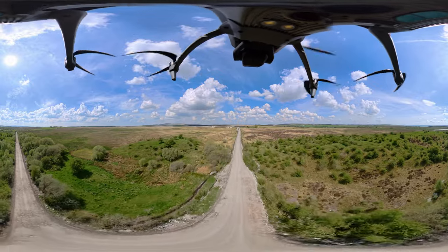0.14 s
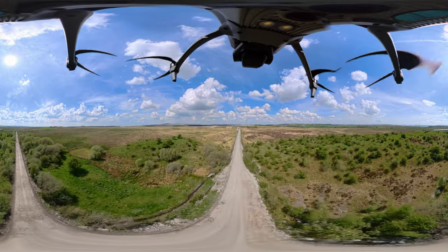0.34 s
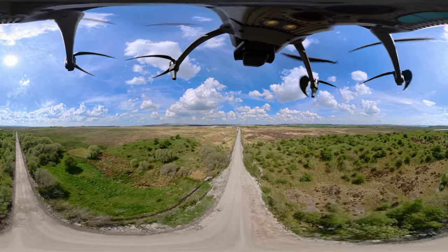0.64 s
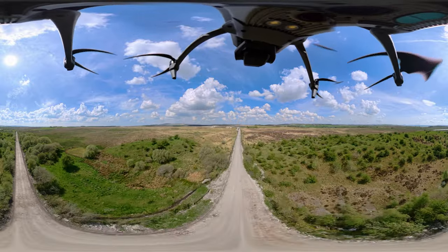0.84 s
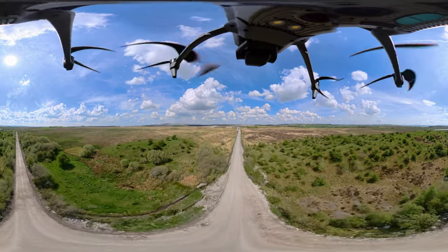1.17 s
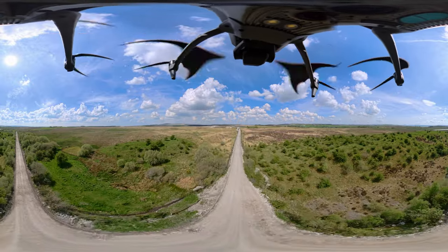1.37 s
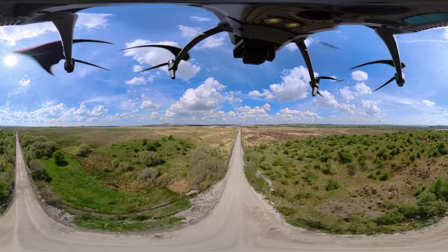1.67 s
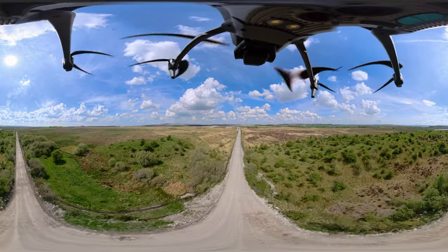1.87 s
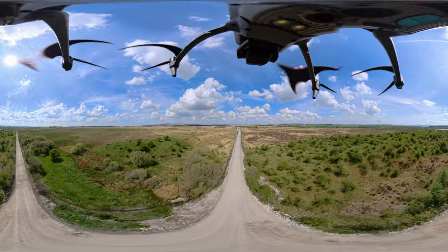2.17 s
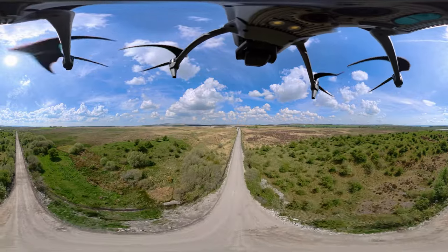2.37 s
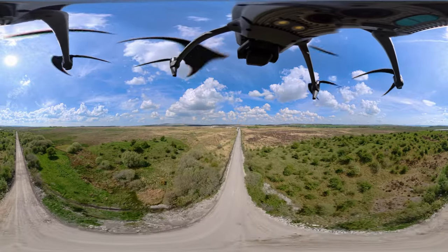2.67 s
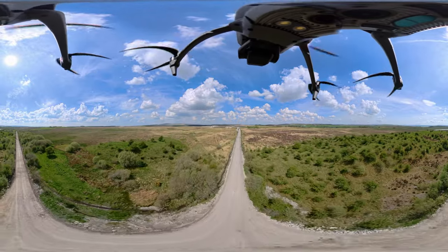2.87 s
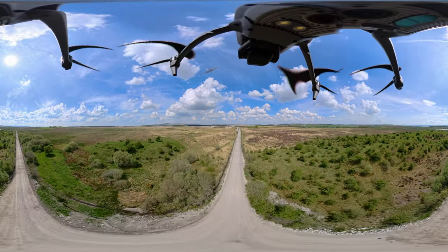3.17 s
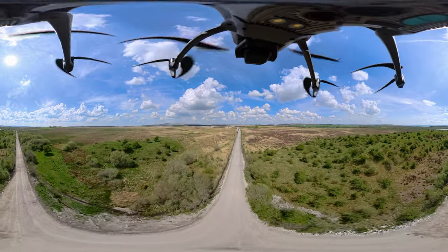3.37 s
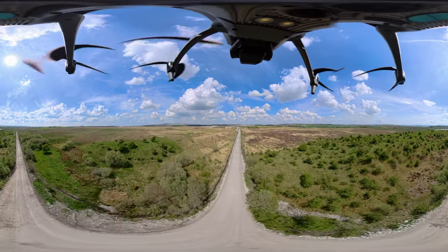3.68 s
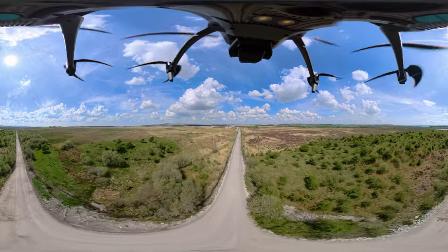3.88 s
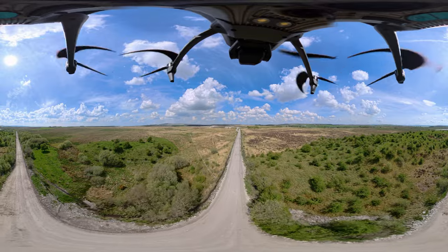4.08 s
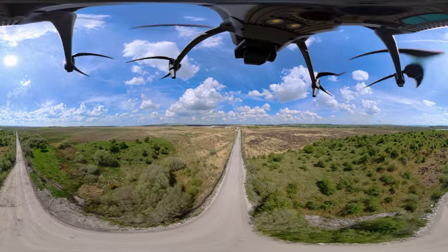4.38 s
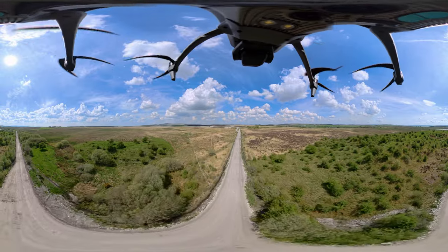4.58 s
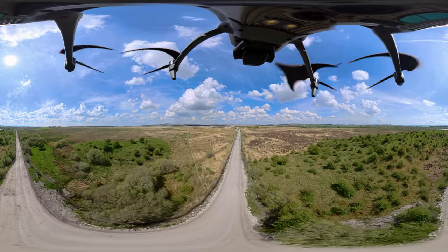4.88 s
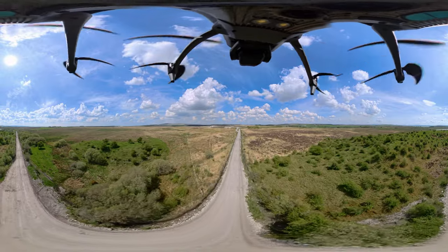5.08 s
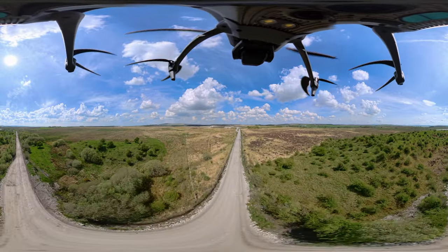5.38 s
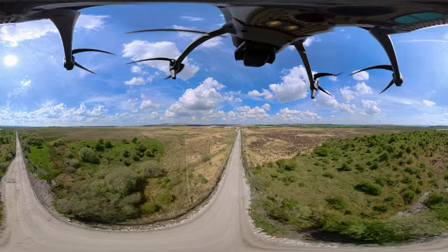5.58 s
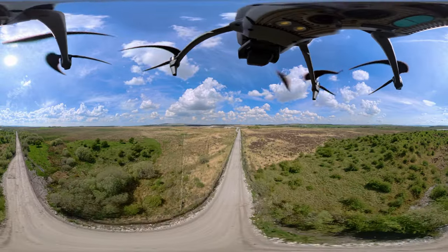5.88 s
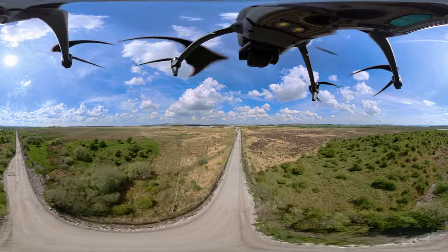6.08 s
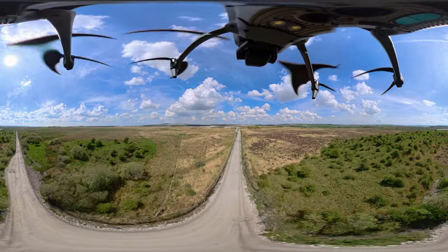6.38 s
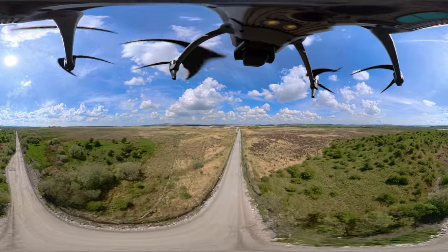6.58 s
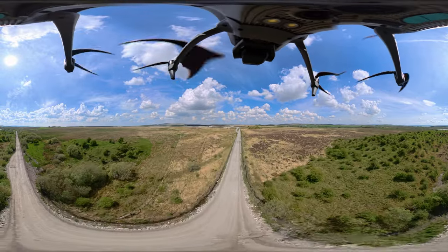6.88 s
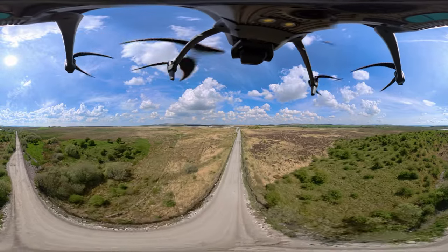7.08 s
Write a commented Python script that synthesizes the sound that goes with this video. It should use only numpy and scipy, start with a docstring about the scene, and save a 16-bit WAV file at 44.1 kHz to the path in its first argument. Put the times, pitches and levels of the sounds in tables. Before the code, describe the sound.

Open moorland on a breezy day, heard through an exposed microphone. A mild gust rumbles at first under faint, brief chirps and a tiny creak at 0.3 s. From about 0.9 s a small bird sings clear, slurred high whistles, strongest between 1.2 and 3 s, with thin, very high twitters around 1.3-2.6 s. Lower chirps from another bird answer, notably at 3-3.5 s and 4.4 s. Deep gusts swell from 1.1 to 4 s, with soft thumps near 1.4, 3 and 3.9 s. The mount creaks and clicks, sharpest at 4.0 s, with a ringing tick at 4.3 s. A fine close rustle runs from 4.2 to 5.1 s, with a rough, narrow swish near 4.9 s. The wind then eases, chirps thin out, and distant raspy gulls call from 5.8 s, clearer around 6.7-7.2 s, over breeze, hiss and a faint steady tone.

```python
"""Birds on open moorland

A breezy day: two small birds trade slurred whistles built from a few syllables, with thin wavering sounds among
them: high twitter phrases, then one rough, narrow swish in the song's range. More birds and gulls call far off.
Whistles, twitter and that swish are gliding tones; gulls are harmonics chopped into a rasp. Filtered noise makes
the gusts rumbling on the microphone, the breeze and a close rustle; close by, the mount creaks in runs of slips
and ticks with ringing tones. Hiss and a faint tone lie beneath."""
import sys
import numpy as np
from scipy import signal
from scipy.fft import rfft, irfft, next_fast_len
from scipy.io import wavfile
from scipy.ndimage import uniform_filter1d, map_coordinates

SR = 44100
rng = np.random.default_rng(int(sys.argv[2]) if len(sys.argv) > 2 else 0)


def wav_out(sig):
    """Save sig, one row per channel (or a flat mono array), as 16-bit PCM at SR to the path in sys.argv[1]."""
    wavfile.write(sys.argv[1], SR, np.round(np.clip(np.atleast_2d(sig).T, -1, 1) * 32767).astype(np.int16))


N = 319284

# syllables of the song, by name: length_share [0-1], pitch_share [0-1, low to high], relative_level_db [dB]
SYLLABLES = { "peak": [(0.0, 0.19, -24.5), (0.32, 0.18, -2), (0.5, 0.6, -12), (0.66, 0.72, -32),
             (0.83, 0.93, -16), (1.0, 0.0, -3.5)], "spike": [(0.0, 0.36, -15), (0.3, 0.46, -2),
             (0.49, 0.91, -12), (0.66, 0.26, -2), (1.0, 0.042, -10.5)], "arch": [(0.0, 0.33, -11),
             (0.3, 0.76, -2), (0.61, 0.97, 2), (0.84, 0.53, -1.5), (1.0, 0.0, -9.5)],
             "hook": [(0, 0.63, -4), (.33, 0.07, -10), (.66, .3, -2.5), (.83, .6, 2.5), (1, 0.94, -14)],
             "swoop": [(0, .45, 3), (.27, .03, -7), (.5, 0.017, -5), (.72, 0.12, -2.5), (.91, .47, 7.5),
             (1, 0.98, 7.5)], "scoop": [(0, .1, -6), (.33, 0.065, -7), (.72, .38, -1.5), (1, 1, -3.5)],
             "droop": [(0.0, 0.96, -14), (0.39, 0.76, -5), (0.78, 0.74, -10), (1.0, 0.047, -3)],
             "slide": [(0, 1, -4), (.3, .69, 1), (.64, .6, 0), (.88, .39, -2), (1, 0, -11)],
             "stair": [(0.0, 0.0062, -13), (0.15, 0.125, 0.5), (0.44, 0.3, 1), (0.63, 0.78, -4),
             (1.0, 0.94, 0)], "curl": [(0, 0, -6), (.09, .02, -3), (.2, .3, 0), (.45, .16, 0),
             (.69, .49, 1), (.87, .68, -3), (1, 1, -6)], "fall": [(0.0, 0.94, -2), (0.33, 0.63, -1),
             (0.74, 0.3, -0.5), (1.0, 0.032, -2)], "rise": [(0.0, 0.043, -6), (0.43, 0.52, -2.5),
             (1.0, 0.96, -4)]}
# notes sung to each syllable: start_s [s], length_s [s], low_hz [Hz], high_hz [Hz],
# base_level_db [dB, the syllable's level is added]
SONG_NOTES = { "peak": [(0.935, 0.072, 4800, 5930, -70.5), (1.091, 0.081, 4510, 6680, -63),
              (1.268, 0.074, 4526, 7090, -51), (1.44, 0.088, 4360, 7040, -61)],
              "spike": [(2.588, 0.086, 4600, 7070, -60.5), (2.73, 0.12, 4410, 7570, -70.5),
              (2.891, 0.097, 4425, 7970, -60.5), (3.745, .07, 2973, 3820, -71),
              (3.914, 0.1, 2780, 3610, -75)], "hook": [(2.005, .088, 3670, 6680, -64.5),
              (6.228, .085, 2490, 3530, -86.5)], "swoop": [(3.548, .1, 3210, 5280, -66)],
              "scoop": [(1.828, 0.077, 3580, 6330, -66), (4.72, 0.13, 2720, 3260, -73),
              (5.598, 0.059, 3160, 3960, -80), (5.803, 0.062, 3360, 4160, -80.5),
              (6.005, 0.13, 2620, 3650, -86)], "droop": [(2.201, 0.058, 5394, 7400, -66.5),
              (2.344, 0.054, 6400, 7020, -65.5), (2.47, 0.065, 4800, 7365, -67.5)],
              "slide": [(1.615, .116, 3230, 6090, -68)], "arch": [(.665, 0.043, 3300, 3650, -87),
              (0.845, 0.035, 3195, 3740, -81), (1.808, 0.021, 3970, 4300, -73),
              (2.085, 0.028, 6630, 7100, -81), (2.176, 0.1, 2950, 4390, -69.5),
              (2.337, 0.089, 2770, 4187, -67.5), (3.049, 0.099, 3730, 4225, -61),
              (3.195, 0.048, 2360, 3360, -73.5), (3.223, 0.109, 3765, 4230, -68),
              (3.393, 0.098, 3580, 4244, -60), (3.665, .05, 2380, 2540, -85.5),
              (4.387, 0.027, 3100, 4380, -61)], "stair": [(2.492, .108, 2510, 4460, -71.5),
              (2.666, 0.152, 2638, 4370, -67.5)], "curl": [(5.182, .118, 2830, 4900, -84),
              (5.39, .123, 2800, 5100, -80.5)], "fall": [(.13, 0.038, 3120, 3550, -87),
              (.815, 0.02, 4280, 4830, -84), (1.185, 0.062, 3900, 4320, -83.5),
              (0.885, 0.038, 3080, 3133, -84), (2.903, 0.1363, 2660, 3700, -77),
              (3.121, 0.048, 2290, 3250, -77), (3.321, 0.071, 2275, 3270, -80),
              (3.805, .045, 2670, 3020, -81.5), (4.016, 0.054, 2646, 3400, -86),
              (4.319, 0.039, 2600, 3250, -71.5), (4.47, 0.06, 2780, 3630, -89),
              (4.525, 0.047, 2680, 2750, -79), (4.955, 0.04, 2290, 3230, -81.5),
              (5.677, 0.043, 2820, 3950, -91.5), (5.875, 0.067, 2770, 3860, -92),
              (6.445, 0.08, 2550, 3780, -83.5), (6.649, 0.058, 3310, 3920, -84),
              (7.012, 0.016, 2400, 4020, -82)], "rise": [(0.022, 0.0526, 5060, 5840, -84),
              (0.22, 0.029, 4410, 5020, -79), (.322, 0.039, 3950, 4910, -81),
              (0.53, 0.025, 3200, 4224, -87), (1.019, 0.034, 2877, 3790, -79),
              (1.145, 0.019, 2920, 4120, -78.5), (.45, .04, 2670, 3090, -86),
              (3.685, 0.064, 2750, 3500, -77), (3.8, 0.1, 2300, 3550, -83), (4.08, 0.05, 2680, 3050, -84),
              (4.12, 0.12, 2780, 3360, -73), (4.682, 0.032, 2343, 3510, -76.5),
              (6.852, 0.075, 2505, 3400, -79), (7.038, 0.072, 2454, 3330, -77.5),
              (7.21, 0.028, 2680, 3550, -79)]}
# thin wavering sounds, one arch each: high twitter phrases, then (last row) one rough, narrow swish in the
# song's range: start_s [s], length_s [s], low_hz [Hz], high_hz [Hz], base_level_db [dB, the arch's is added]
WAVERING_SOUNDS = [(1.336, 0.22, 8570, 8860, -92.5), (1.472, 0.15, 8500, 9350, -87),
                   (1.762, .17, 8700, 9140, -91), (2.437, .15, 8400, 9700, -85.5),
                   (2.578, .15, 8070, 8300, -94), (4.863, .27, 4280, 4890, -82)]
# gull calls, by voice: start_s [s], length_s [s], end_hz [Hz], beginning_hz [Hz],
# base_level_db [dB, the cry's level is added]
GULL_CALL_NOTES = {"full": [(5.82, .29, 1030, 1080, -85.5), (6.712, 0.152, 1170, 1210, -73),
                   (6.866, .28, 1045, 1100, -72)], "thin": [(5.84, .18, 1040, 1070, -85),
                   (6.27, .2, 984, 960, -83), (6.745, 0.095, 962, 975, -73.5), (7.11, .2, 961, 1002, -74)]}
# course of every gull cry: length_share [0-1], pitch_change_left [0-1], relative_level_db [dB]
GULL_CRY_SHAPE = [(0, 1, -6), (.3, .4, -1), (.72, .15, -1), (1, 0.0045, -3.5)]
# resonance of the two gull voices: frequency_hz [Hz], relative_level_db [dB]
FULL_GULL_THROAT = [(1050, -24), (2100, 0), (2450, 6), (3150, -27), (4200, -10.5), (5200, -9), (7000, -46)]
THIN_GULL_THROAT = [(1950, -5.5), (2900, -12), (3850, -4), (4850, -5.5), (7000, -19)]
# gusts on the microphone: start_s [s], attack_s [s], hold_s [s], relative_buffet_db [dB], release_s [s]
GUST_EVENTS = [(0.153, 0.15, 0.49, -57.5, 0.13), (1.104, 0.39, 0.033, -45.5, 0.022),
               (1.367, 0.016, 0.44, -46.5, 0.11), (2.014, 0.081, 0.039, -52, 0.18),
               (2.243, 0.1, 0.2, -47, 0.028), (2.898, 0.097, 0.03, -47.5, 0.076),
               (3.092, 0.08, 0.74, -48.5, 0.1), (3.832, 0.041, 0.077, -43.5, 0.18),
               (5.429, 0.079, 0.027, -54, 0.081), (5.65, 0.17, 1.24, -59.5, 0.15)]
# single eddies that thump the microphone: middle_s [s], swing_db [dB, before the fade around the middle]
THUMP_EVENTS = [(.715, -40), (1.446, -35), (2.997, -30.5), (3.934, -29.5), (5.519, -42)]
# spectrum of the buffeting: frequency_hz [Hz], relative_level_db [dB per Hz]
RUMBLE_SPECTRUM = [(12, -31), (22, 0.5), (38, 0.5), (55, -1), (229, -29.5), (600, -46), (2400, -60),
                   (9000, -73)]
# slow course of the breeze: time_s [s], relative_level_db [dB]
BREEZE_LEVEL = [(0, -79), (1.27, -74.5), (4.17, -75), (4.76, -76.5), (7.24, -72)]
# spectrum of the breeze: frequency_hz [Hz], relative_level_db [dB per Hz]
BREEZE_SPECTRUM = [(40, -20), (100, -6.5), (283, -14.5), (543, -17), (750, -22), (1080, -21.5),
                   (1400, -30.5), (4000, -44)]
# strokes of the rustle: time_s [s], relative_level_db [dB]
RUSTLE_STROKES = [(4.23, -93), (4.32, -82.5), (4.47, -76.5), (4.58, -78.5), (4.68, -93.5), (4.77, -77.5),
                  (4.85, -86.5), (4.93, -81), (5.04, -83.5), (5.14, -97)]
# spectrum of the rustle: frequency_hz [Hz], relative_level_db [dB per Hz]
RUSTLE_SPECTRUM = [(3400, -10), (4800, 1), (6600, -11), (7300, -24), (9900, -9.5), (10400, -6),
                   (11000, -11.5), (15500, -7)]
# ticks of the mount: start_s [s], knock_gain_db [dB], ping_gain_db [dB], ping_hz [Hz]
MOUNT_TICKS = [(2.581, -66.5, -67, 11700), (3.425, -66.5, -63, 11500), (3.464, -59, -79, 12100),
               (3.742, -81.5, -66, 13000), (4.0105, -46.5, -85, 8750), (4.021, -66, -66, 12000),
               (4.325, -65, -53.5, 4720)]
# ringing modes of the mount: pitch_hz [Hz], relative_level_db [dB], t60_s [s]
MOUNT_MODES = [(1663, 1, 0.013), (2050, -0.5, 0.0089), (1040, 0.5, 0.004), (5200, -5, 0.0081)]
# short creaks of the mount: middle_s [s], level_db [dB, before the body's response]
MOUNT_CREAKS = [(0.335, -89.5), (1.445, -85), (1.777, -81.5), (2.953, -88.5)]
# response of the creaking body: frequency_hz [Hz], gain_db [dB]
CREAK_BODY = [(200, 15), (600, 30.5), (1800, 22.0), (3000, 19.5), (6000, 12.5), (12000, -2)]
# spectrum of the background hiss: frequency_hz [Hz], relative_level_db [dB per Hz]
HISS_SPECTRUM = [(700, -22), (1300, -6.5), (3500, -3), (7200, -7.5), (14000, -12.5), (15500, -27.5)]

CALM_DB = -72.5  # buffet between gusts, on the same relative scale as the gusts
TURBULENCE_DB, TURBULENCE_PER_S = 1.5, 9.8  # scale of the stirring, random knots a second
HUM_HZ = 829.3
TOP_HZ = 15750  # band limit


def amp(db):
    """Decibels to gain."""
    return 10 ** (np.asarray(db) / 20)


def unit(x):
    """Scale to rms 1."""
    return x / np.sqrt(np.mean(x ** 2) + 1e-20)


def along(points, hz):
    """Read (Hz, value) points on a log frequency axis."""
    f, v = np.transpose(points)
    return np.interp(np.log(hz + 1), np.log(f + 1), v)


def curve(rows):
    """One value per sample from (s, value) rows."""
    return np.interp(np.arange(N) / SR, *np.transpose(rows))


def wobble(rate, size=N):
    """A smooth random curve, rate knots a second."""
    knots = rng.standard_normal(int(size * rate / SR) + 4)
    return map_coordinates(knots, [np.arange(size) * rate / SR])


def filtered(x, response):
    """Multiply the spectrum of x by a response of frequency."""
    m = next_fast_len(N + SR // 2)
    return irfft(rfft(x, m) * response(np.fft.rfftfreq(m, 1 / SR)), m)[:N]


def noise(spectrum):
    """Coloured noise of rms 1."""
    white = rng.standard_normal(N)
    return unit(filtered(white, lambda hz: amp(along(spectrum, hz))))


def add(track, s, sound):
    """Mix a sound into the track at s seconds."""
    room = track[max(round(s * SR), 0):][:len(sound)]
    room += sound[:len(room)]


def sung(shape, s, length, low_hz, high_hz, level_db):
    """Stretch a shape to one sound's length and pitch range: (s, Hz, dB) points."""
    when, height, db = np.transpose(shape)
    pitch = low_hz * (high_hz / low_hz) ** height
    return np.column_stack([s + length * when, pitch, level_db + db])


def glide(note, fade):
    """Start time, then pitch and gain per sample of a note slurred smoothly through its points."""
    u = np.linspace(0, len(note) - 1, 100)
    s, hz, db = (map_coordinates(col, [u], mode="mirror") for col in np.transpose(note))
    s = np.maximum.accumulate(s)  # time never runs backwards
    t = s[0] + np.arange(int((s[-1] - s[0]) * SR) + 2) / SR
    ends = np.clip(np.minimum(t - t[0], t[-1] - t) / fade, 0, 1)
    return t[0], np.interp(t, s, hz), ends * amp(np.interp(t, s, db))


def gliding_tones(notes, waver, waver_rate, flutter_db):
    """Sine tones slur and waver in pitch, nearly pure or roughened by the waver; their level flutters."""
    track = np.zeros(N)
    for note in notes:
        s, hz, gain = glide(note, fade=0.003)
        hz = hz * (1 + waver * wobble(waver_rate, size=len(hz)))
        gain = gain * amp(flutter_db * wobble(161.5, size=len(hz)))
        tone = np.sqrt(2) * np.sin(2 * np.pi * np.cumsum(hz) / SR)
        add(track, s, gain * tone)
    return track


def whistles():
    """A syrinx sings a nearly pure tone; moving air flutters its level on the way."""
    notes = [sung(SYLLABLES[name], *row) for name, rows in SONG_NOTES.items() for row in rows]
    return gliding_tones(notes, waver=0.007, waver_rate=250, flutter_db=2.5)


def wavering_sounds():
    """Fast, wide pitch waver thins and roughens arched tones: high twitter phrases, then one narrow swish."""
    arches = [sung(SYLLABLES["arch"], *row) for row in WAVERING_SOUNDS]
    return gliding_tones(arches, waver=0.024, waver_rate=500, flutter_db=5.5)


def gull(calls, throat, rasp_hz, sag, sharpness, jitter, shimmer_db):
    """A hoarse harmonic voice chopped into a fast, even rasp; the pitch sags within each beat."""
    voice = np.zeros(N)
    k = np.arange(1, 8)[:, None]  # harmonic numbers
    for call in calls:
        s, hz, gain = glide(call, fade=0.0044)
        beat_hz = rasp_hz * (1 + 0.022 * wobble(50, size=len(hz)))
        beat = 2 * np.pi * np.cumsum(beat_hz) / SR - np.pi  # starts closed
        hz = hz * (1 - sag * np.sin(beat) + jitter * wobble(900, size=len(hz)))
        shimmer = shimmer_db * np.array([wobble(207.3, size=len(hz)) for _ in k])
        partials = amp(along(throat, k * hz) + shimmer)
        phase = 2 * np.pi * k * np.cumsum(hz) / SR + rng.uniform(0, 2 * np.pi, k.shape)
        tone = np.sum(partials * np.sin(phase), axis=0)
        rasp = (1 + np.cos(beat)) ** sharpness
        add(voice, s, gain * unit(tone * rasp))
    return voice


def moor(x, t60, onset, stir_rate):
    """Wind-stirred scrub scatters a thin tail and blurs its pitch."""
    t = np.arange(SR) / SR
    tail = rng.standard_normal(SR) * amp(-60 * t / t60) * (1 - np.exp(-t / onset))
    return signal.fftconvolve(x * wobble(stir_rate), tail / np.linalg.norm(tail))[:N]


def gusts():
    """Strength of the wind: each gust rises, holds and dies away; turbulence stirs them all."""
    t = np.arange(N) / SR
    power = np.full(N, amp(CALM_DB) ** 2)
    for s, attack, hold, db, release in GUST_EVENTS:
        rise = np.clip((t - s) / attack, 0, 1)
        fall = np.exp(-np.maximum(t - s - attack - hold, 0) / release)
        power += (amp(db) * rise * fall) ** 2
    return np.sqrt(power) * amp(TURBULENCE_DB * wobble(TURBULENCE_PER_S))


def buffeting(buffet_db, evenness):
    """Eddies rumble on the microphone as gusts pass, their own swells partly evened out."""
    eddies = noise(RUMBLE_SPECTRUM)
    swell = np.sqrt(np.abs(uniform_filter1d(eddies ** 2, size=SR // 12)) + 1e-6)
    return gusts() * amp(buffet_db) * unit(eddies / swell ** evenness)


def thumps(thump_hz, width):
    """A single large eddy shoves the diaphragm and sucks it back."""
    t = np.arange(N) / SR
    total = np.zeros(N)
    for s, db in THUMP_EVENTS:
        swing = -amp(db) * np.sin(2 * np.pi * thump_hz * (t - s))
        total += swing * np.exp(-((t - s) / width) ** 2)
    return total


def rustle(level_db, grain_db):
    """A few soft, finely grained swishes close to the microphone."""
    before = (RUSTLE_STROKES[0][0] - 0.1, -120)
    after = (RUSTLE_STROKES[-1][0] + 0.072, -120)
    level = curve([before] + list(RUSTLE_STROKES) + [after])
    grain = amp(grain_db * wobble(650))
    return amp(level + level_db) * unit(noise(RUSTLE_SPECTRUM) * grain)


def mount_ticks(crack_db, crack_hz):
    """The plastic mount rings briefly: a knock of decaying modes and dull noise, with a rough high ping."""
    t = np.arange(SR // 20) / SR
    ring = sum(amp(db - 60 * t / t60) * np.sin(2 * np.pi * hz * t) for hz, db, t60 in MOUNT_MODES)
    low_pass = signal.butter(2, crack_hz, fs=SR)
    ticks = np.zeros(N)
    for s, db, ping_db, ping_hz in MOUNT_TICKS:
        crack = signal.lfilter(*low_pass, rng.standard_normal(len(t)))
        knock = 0.83 * ring + amp(crack_db - 60 * t / 0.011) * crack
        rough = wobble(ping_hz / 5, size=len(t))
        ping = amp(-60 * t / 0.025) * rough * np.sin(2 * np.pi * ping_hz * t)
        add(ticks, s, amp(db) * knock + amp(ping_db) * ping)
    return ticks


def mount_creaks(creak_hz, creak_width):
    """Quick, slightly uneven runs of slips excite the body of the mount."""
    t = np.arange(SR // 20) / SR
    middle = t.mean()
    slips = np.zeros(N)
    for s, db in MOUNT_CREAKS:
        turns = np.cumsum(creak_hz * (1 + 0.031 * wobble(400, size=len(t)))) / SR
        run = np.diff(np.floor(turns), prepend=0)  # one click per turn
        add(slips, s - middle, amp(db) * unit(run) * np.exp(-((t - middle) / creak_width) ** 2))
    return filtered(slips, lambda hz: amp(along(CREAK_BODY, hz)))


def breeze(breeze_db):
    """A soft breeze in the heather: coloured noise on a slowly stirred level."""
    level_db = curve(BREEZE_LEVEL) + breeze_db + 2.4 * wobble(6.1)
    return amp(level_db) * noise(BREEZE_SPECTRUM)


def background(hiss_db, hum_db):
    """Even hiss and one faint, nearly steady tone."""
    hum_hz = HUM_HZ + 0.7 * wobble(7.4)
    hum = np.sqrt(2) * np.sin(2 * np.pi * np.cumsum(hum_hz) / SR)
    return amp(hiss_db) * noise(HISS_SPECTRUM) + amp(hum_db) * hum


def scene():
    """Calls and their scatter, short from the nearest bushes and long from the moor, over wind and close noises."""
    song = whistles()
    wavering = wavering_sounds()

    cries = {voice: [sung(GULL_CRY_SHAPE, *row) for row in rows] for voice, rows in GULL_CALL_NOTES.items()}
    gulls = gull(cries["full"], FULL_GULL_THROAT, rasp_hz=53.5, sag=0.022, sharpness=0.8,
                 jitter=0.012, shimmer_db=3)
    gulls += gull(cries["thin"], THIN_GULL_THROAT, rasp_hz=47, sag=0.01, sharpness=0.6,
                  jitter=0.02, shimmer_db=4)

    stray = amp(-9) * song + amp(-3) * wavering + gulls  # what reaches the scrub
    scatter = amp(-7.5) * moor(stray, t60=0.25, onset=0.003, stir_rate=230)  # nearest bushes
    scatter += amp(-7) * moor(stray, t60=0.95, onset=0.004, stir_rate=850)  # open moor

    wind = buffeting(buffet_db=2.5, evenness=0.81) + thumps(thump_hz=49.0, width=0.012)
    wind += breeze(breeze_db=2)
    close = rustle(level_db=8.5, grain_db=2.0) + mount_ticks(crack_db=-10.0, crack_hz=7950)
    close += mount_creaks(creak_hz=596.0, creak_width=0.012)
    floor = background(hiss_db=-83.5, hum_db=-87.5)
    return (song + wavering + gulls + scatter + wind + close + floor)[None]


def record(dry):
    """The recorder keeps nothing above its band limit."""
    return filtered(dry[0], lambda hz: hz < TOP_HZ)[None]


dry = scene()
out = record(dry)
wav_out(out)
```